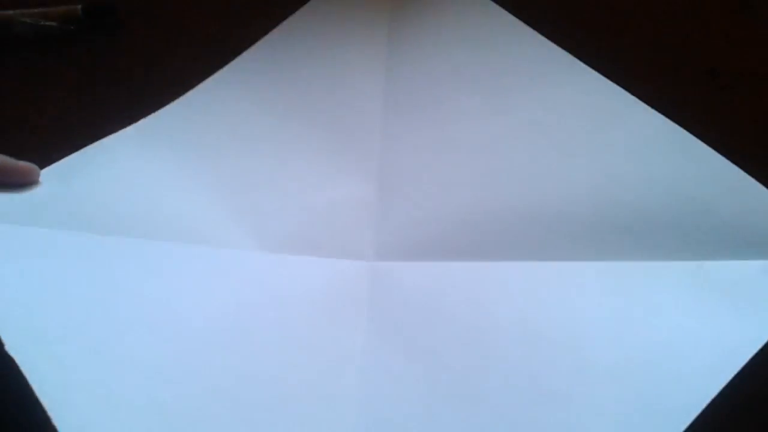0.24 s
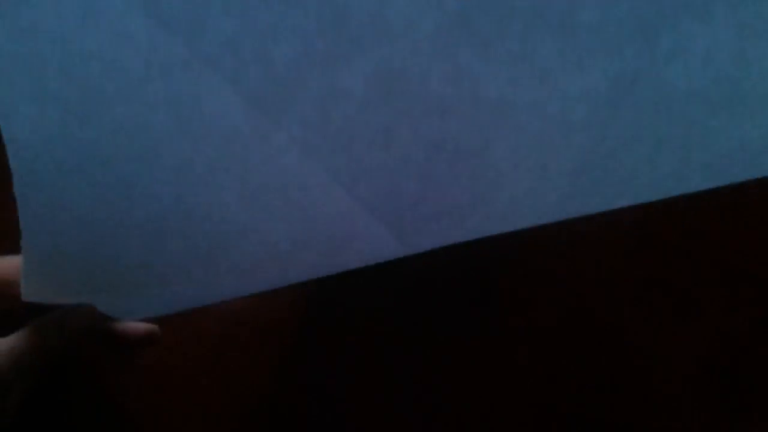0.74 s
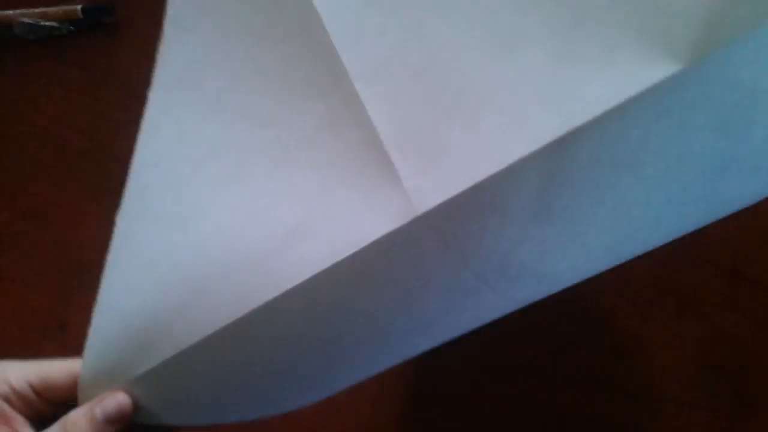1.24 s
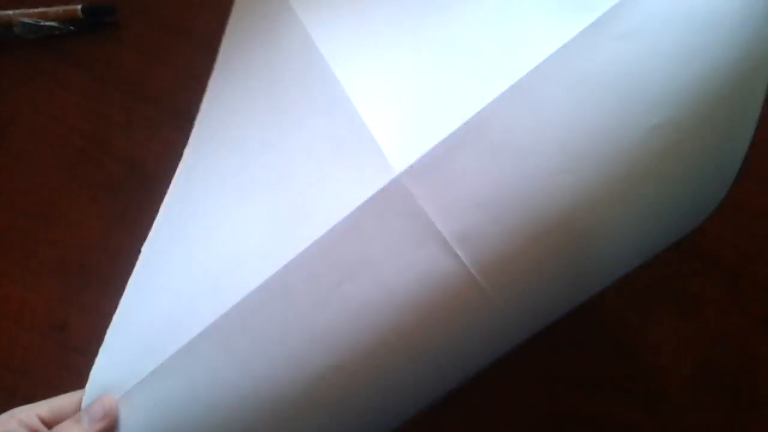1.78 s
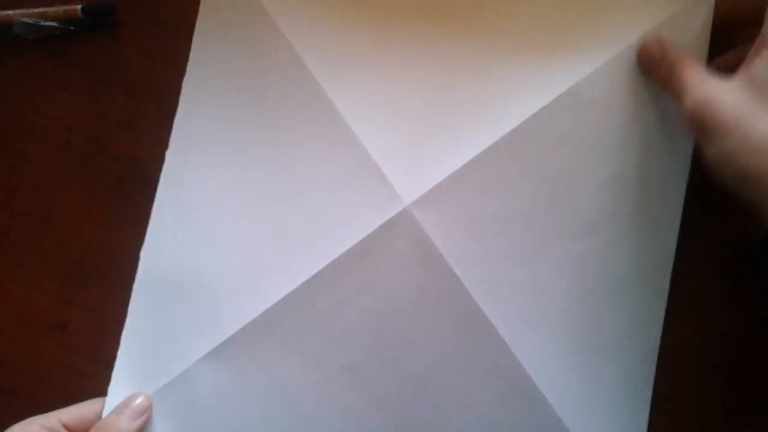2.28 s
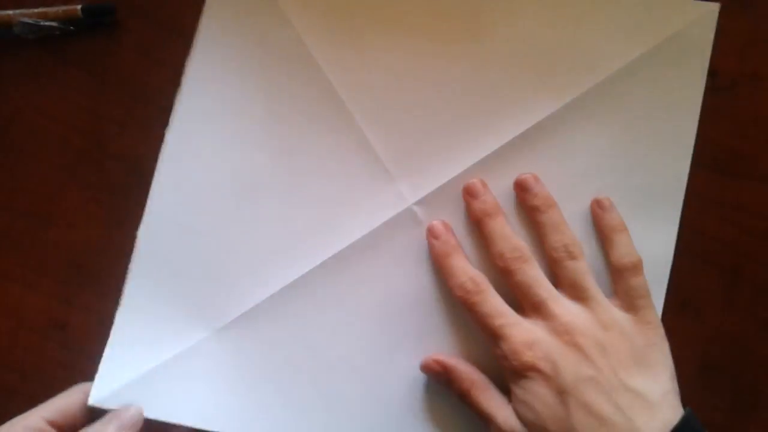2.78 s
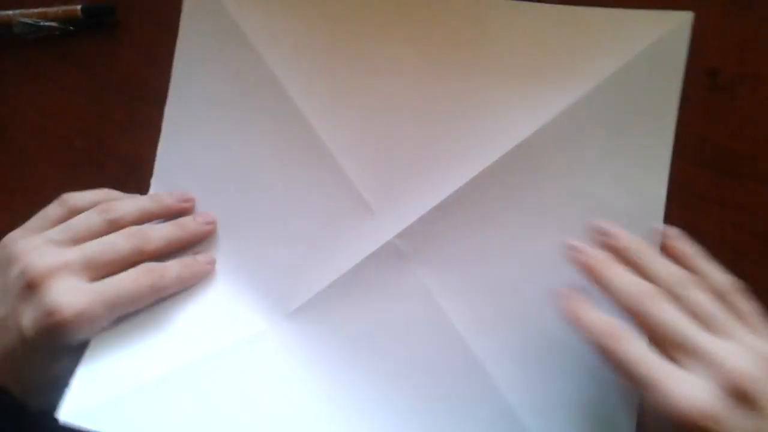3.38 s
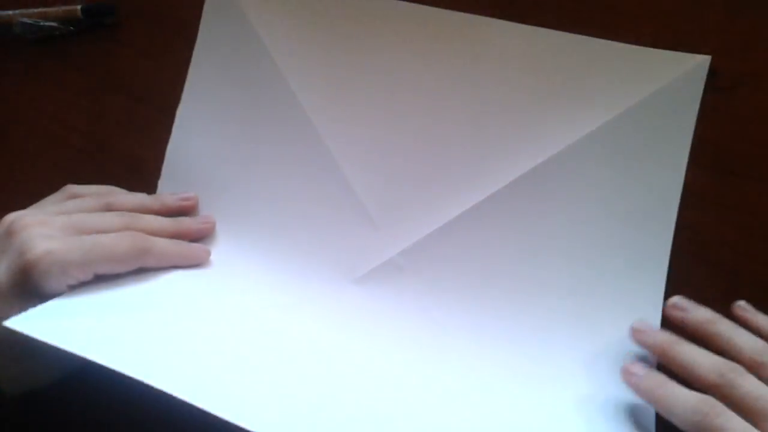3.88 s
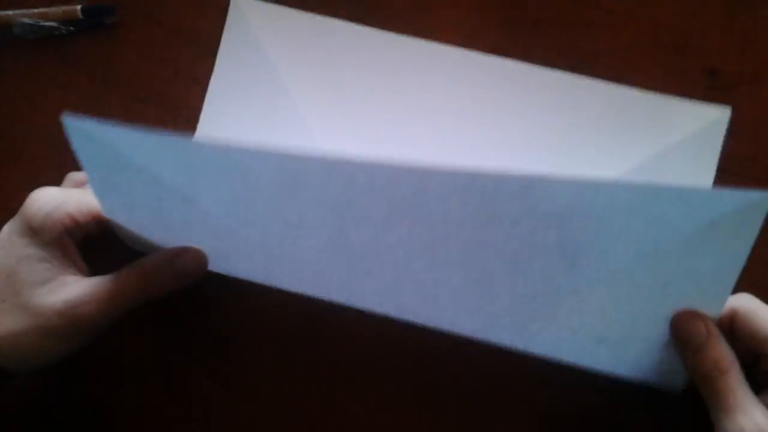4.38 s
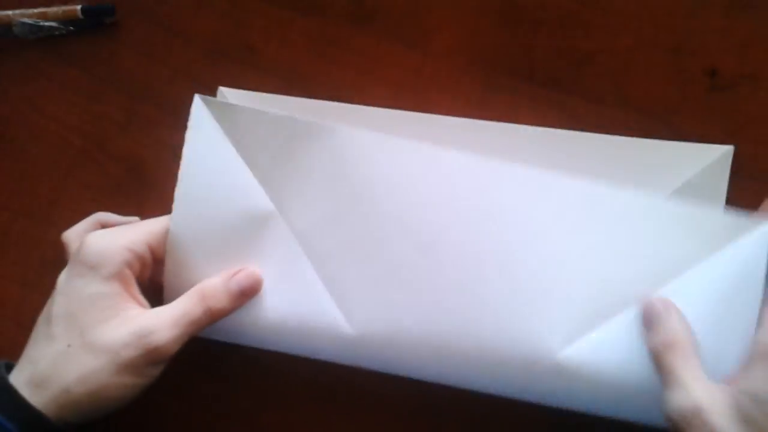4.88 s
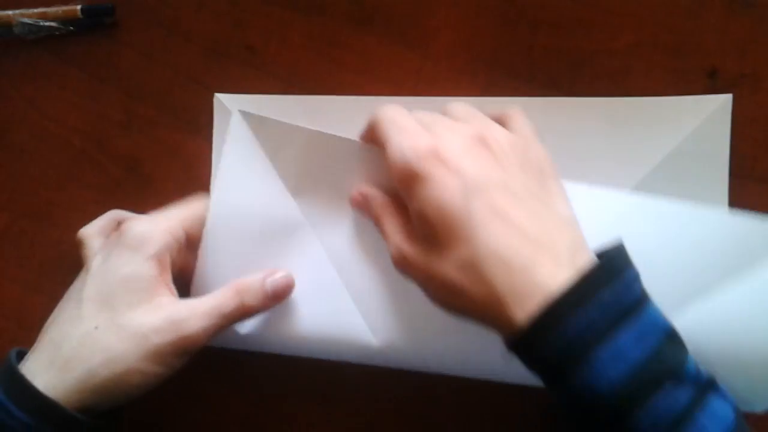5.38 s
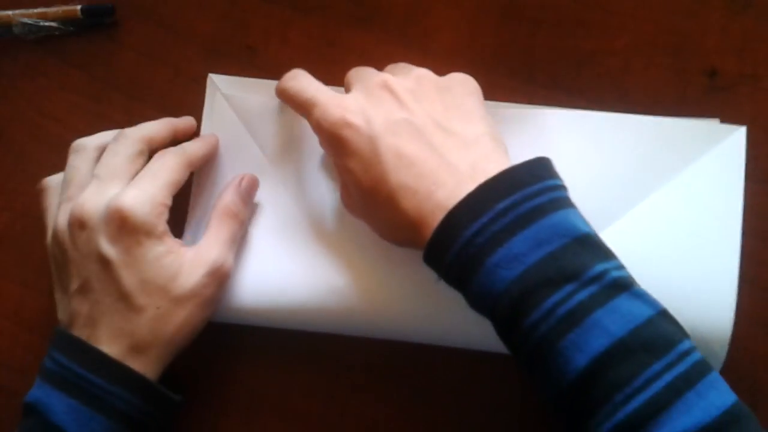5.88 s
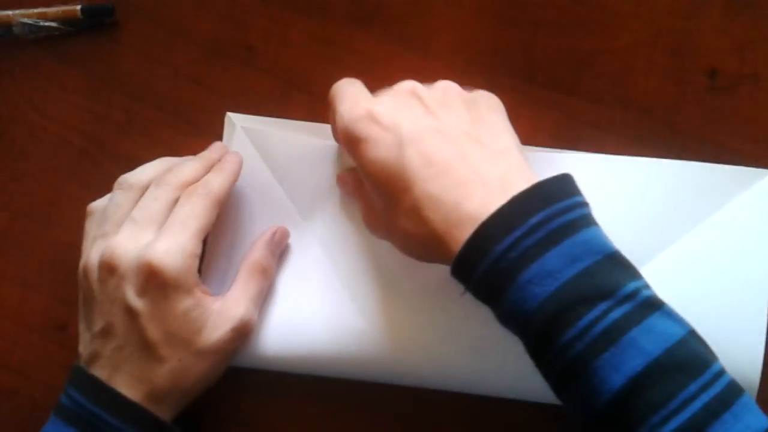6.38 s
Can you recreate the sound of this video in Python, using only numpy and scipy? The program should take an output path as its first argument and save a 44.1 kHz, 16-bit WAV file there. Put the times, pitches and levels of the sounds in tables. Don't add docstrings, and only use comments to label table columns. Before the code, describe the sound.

Stiff paper rustles and ticks as hands turn and fold it, with louder sharp crease pops near the end in a humming room.

```python
import sys
import numpy as np
from scipy import signal
from scipy.fft import rfft, irfft, next_fast_len
from scipy.io import wavfile
from scipy.ndimage import uniform_filter1d

SR = 44100
rng = np.random.default_rng(int(sys.argv[2]) if len(sys.argv) > 2 else 0)


def voltage_ratio(level):
    return 10 ** (np.asarray(level, float) / 20)


def generate_wav(signal):
    frames = np.transpose(np.atleast_2d(signal))
    scaled = np.clip(frames, -1, 1) * 32767
    pcm = np.round(scaled).astype(np.int16)
    wavfile.write(sys.argv[1], SR, pcm)


N = 292806

# low_hz, high_hz
PARTS = [
    (760, 1597),
    (1560, 3570),
    (3500, 7370),
]


def unit(x):
    return x / np.sqrt(np.mean(x ** 2))


def band(x, lo_hz, hi_hz, order=2):
    return signal.sosfilt(signal.butter(order, [lo_hz, hi_hz], "band", fs=SR, output="sos"), x)


def walk(rate_hz):
    hold = int(SR / rate_hz)
    steps = np.repeat(rng.standard_normal(N // hold + 1), hold)
    smooth = uniform_filter1d(uniform_filter1d(steps, hold), hold)
    return 1.3 * smooth[:N]


def fibres(shape, rate_hz, spread_db):
    slips = rng.random(shape) < rate_hz / SR
    size = np.minimum(rng.exponential(size=shape), 4)
    return slips * rng.standard_normal(shape) * voltage_ratio(spread_db * size)


def shares(level_db, tilt_db, focus_db):
    return level_db - tilt_db - focus_db, level_db, level_db + tilt_db - focus_db


def hum():
    # multiple, level_db (rms)
    tones = [(1, -75.5), (2, -73), (3, -71.5), (4, -72.5), (5, -56.5), (6, -60), (7, -72), (8, -82.5)]
    phase = 2 * np.pi * 100.08 * np.arange(N) / SR
    out = np.zeros(N)
    for multiple, level_db in tones:
        breath_db = min(2.1, 6 * voltage_ratio(-66 - level_db))
        level = np.sqrt(2) * voltage_ratio(level_db + breath_db * walk(6.9))
        out += level * np.sin(multiple * phase + 2 * np.pi * rng.random())
    return out


def fan():
    # pitch_hz, width_hz, level_db (rms)
    blurred = [(122.8, 15, -70), (203, 32, -68.5), (1151, 4.5, -68.5), (1375, 9.9, -70), (1650, 20, -75.5)]
    # pitch_hz, level_db (per Hz)
    air = [(30, -49.5), (60, -10), (110, -9), (165, -18.5), (250, 1), (450, 1), (800, -3), (1300, -5),
           (2000, -12.5), (4000, -14), (7000, -28.5)]
    tones = np.zeros(N)
    for hz, width, level_db in blurred:
        tone = band(rng.standard_normal(N), hz - width / 2, hz + width / 2, order=1)
        tones += voltage_ratio(level_db) * unit(tone)
    hz, level_db = np.transpose(air)
    n = next_fast_len(N)
    pitches = np.fft.rfftfreq(n, 1 / SR)
    colour = voltage_ratio(np.interp(np.log(pitches + 1), np.log(hz), level_db))
    rush = irfft(rfft(rng.standard_normal(n)) * colour, n)[:N]
    return tones + voltage_ratio(-61) * unit(rush)


def puffs():
    # start_s, peak_db, pitch_hz, length_s
    gusts = [(1.671, -46.5, 72.6, 0.041), (1.787, -46, 95, 0.034), (1.923, -64, 50, 0.053),
             (2.004, -58, 59, 0.049), (5.712, -48, 120, 0.049)]
    out = np.zeros(N)
    for start, peak_db, hz, length in gusts:
        t = np.arange(int(length * SR)) / SR
        swell = np.sin(np.pi * t / length) ** 2
        cycles = np.sin(2 * np.pi * hz * t * (1 - 0.042 * t / length))
        i = int(start * SR)
        out[i:i + len(t)] += voltage_ratio(peak_db) * swell * cycles
    return out


def strokes():
    # fastest_s, spread_s, level_db, tilt_db
    moves = [(.005, 0.022, -65, 6), (0.348, 0.054, -53.5, 3), (.47, 0.021, -59, 2.5), (.66, 0.18, -66, 4.5),
             (.89, 0.16, -62.5, 1.5), (1.161, 0.061, -58, 2.5), (1.35, 0.063, -63.5, 2),
             (1.531, 0.062, -61, 2.5), (1.749, 0.08, -56.5, 5), (1.9, .04, -62.5, 5.5),
             (2.192, 0.045, -58.5, 1), (2.62, 0.037, -64, 5), (2.831, 0.077, -57.5, 5.5),
             (3.141, 0.062, -58, 8), (3.25, 0.046, -58, -1), (3.42, 0.11, -64.5, 2), (3.59, 0.037, -67, 5),
             (3.905, 0.082, -54, 3), (4.19, 0.084, -63.5, 3.5), (4.339, 0.048, -67, 12),
             (4.67, 0.11, -53.5, 0), (4.88, 0.036, -47.5, -2), (5.041, 0.037, -52.5, 2),
             (5.28, 0.085, -57, 0), (5.448, 0.08, -49.5, 1), (5.66, .04, -55.5, 4.5),
             (5.778, 0.033, -53, 6), (6.11, 0.062, -50, 2), (6.34, 0.085, -54, 5.5),
             (6.581, 0.12, -53.5, 2)]
    # time_s, level_db
    stir = [(0, -64.5), (1.0, -71), (2.0, -64.5), (2.45, -74.5), (3.0, -65), (3.7, -65), (4.4, -62),
            (5.2, -58.5), (5.9, -58), (6.64, -61.5)]
    focus_db = -0.7
    t = np.arange(N) / SR
    stir_db = np.interp(t, *np.transpose(stir))
    power = voltage_ratio(np.array(shares(stir_db, 1.5, focus_db))) ** 2
    for fastest, spread, level_db, tilt_db in moves:
        part_power = voltage_ratio(np.array(shares(level_db, tilt_db, focus_db))) ** 2
        speed = np.exp(-((t - fastest) / spread) ** 2)
        power = power + np.outer(part_power, speed)
    return np.sqrt(power)


def slide():
    slips = unit(fibres(N, 2500, 1.85))
    scrape = slips * 0.49 + rng.standard_normal(N)
    pressure = walk(30)
    out, sign = 0, 1
    for (lo, hi), gain in zip(PARTS, strokes()):
        edges = np.geomspace(lo, hi, 4)
        part = 0
        for lo_hz, hi_hz in zip(edges, edges[1:]):
            sign = -sign
            swell_db = 2.0 * walk(14) + 2.76 * walk(45)
            part = part + sign * band(scrape, lo_hz, hi_hz) * voltage_ratio(swell_db)
        out = out + unit(part) * gain * voltage_ratio(1.24 * pressure)
    return out


def rings(table, detune_octaves, count):
    out = np.zeros(N + SR)
    t = np.arange(SR // 6) / SR
    chances = rng.uniform(-1.012, 1, (len(table), count))
    for (start, hz, level_db, t60), chance in zip(table, chances):
        pitches = hz * 2 ** (detune_octaves * chance)
        modes = np.sin(2 * np.pi * np.outer(pitches, t)).sum(axis=0) / np.sqrt(3 * count)
        onset = 1 - np.exp(-hz * t)
        i = int(start * SR)
        out[i:i + len(t)] += onset * voltage_ratio(level_db - 60 * t / t60) * modes
    return band(out[:N], 170, 9000)


def table_knocks():
    # start_s, pitch_hz, level_db
    knocks = [(.300, 810, -37), (.318, 842, -38), (.369, 720, -32.5), (1.503, 971, -39), (1.94, 653, -43),
              (3.44, 700, -43), (4.146, 795, -32.5), (5.66, 647, -40.5), (0.431, 447, -43),
              (1.502, 413, -37), (1.862, 422, -34), (1.885, 524, -40.5), (3.434, 350, -45),
              (4.143, 571, -39), (4.845, 560, -39), (4.869, 414, -40), (4.896, 338, -55),
              (4.905, 563, -31.5), (4.930, 420, -46), (4.963, 295, -42.5), (4.974, 499, -35.5),
              (5.158, 424, -37.5), (5.374, 308, -39.5), (5.425, 350, -37.5), (5.47, 363, -46),
              (6.036, 574, -42)]
    table_t60_s = 0.16
    return rings([(*row, table_t60_s) for row in knocks], 0.503, count=9)


def taut_patches():
    # start_s, pitch_hz, level_db, t60_s
    patches = [(.765, 836, -45.5, 0.23), (1.501, 3190, -30, 0.02), (1.798, 4140, -33.5, 0.096),
               (1.807, 3910, -35, 0.082), (1.813, 3200, -27.5, 0.038), (1.861, 4990, -27, 0.056),
               (1.866, 2010, -19.5, 0.061), (2.63, 2363, -23.5, 0.066), (2.889, 4280, -21.5, 0.023),
               (2.660, 4380, -29.5, 0.038), (2.9755, 3320, -26, 0.0093), (3.9735, 3700, -28, 0.015),
               (4.1425, 1680, -34, .012), (2.889, 1290, -21, 0.021), (4.925, 4270, -26, 0.045),
               (4.962, 2630, -35, 0.061), (5.4229, 4820, -12.5, .018), (5.4232, 3090, -6, 0.0043),
               (5.4232, 1920, -10.5, 0.0079), (5.436, 3120, -28, 0.052), (5.4684, 2770, -19, 0.0056),
               (5.4692, 5650, -17, 0.014), (5.475, 2440, -24, 0.089), (6.034, 5040, -16, 0.032),
               (6.036, 930, -27, 0.14), (6.044, 955, -31.5, .1)]
    return rings(patches, 0.12, count=3)


def buckles(table, focus_db):
    # t60_s, level_db
    tails = [
        (0.23, -0.5),
        (0.22, -3.5),
        (0.24, -5),
    ]
    out = np.zeros(N + SR)
    t = np.arange(SR // 4) / SR
    for start, level_db, tilt_db, release, rattle_db in table:
        life = max(release, 2e-4)
        slips = t / life * np.exp(-t / life) * fibres(len(t), 14000, 0.28)
        rattle = rng.standard_normal(len(t)) * (1 - np.exp(-t / (0.00032 + life)))
        i = int(start * SR)
        for (lo, hi), part_db, (t60, tail_db) in zip(PARTS, shares(level_db, tilt_db, focus_db), tails):
            tail = unit(band(rattle * voltage_ratio(-60 * t / t60), lo, hi, order=4))
            burst = unit(band(slips, lo, hi, order=4)) + voltage_ratio(rattle_db + tail_db) * tail
            out[i:i + len(t)] += burst * voltage_ratio(part_db - 14.5)
    return out[:N]


def crumples():
    # start_s, level_db, tilt_db, release_s, rattle_db
    folds = [(.315, -58, 5, 0.012, 6), (1.796, -50.5, 1, 0.0054, 7), (1.833, -53.5, -13.5, 0.0035, 5),
             (1.857, -42, -14, .0017, 1), (1.943, -59, -21.5, 0.0056, -5.5), (2.19, -54, 4, 0.018, 4.5),
             (2.64, -56.5, 8, 0.011, -8), (2.663, -46, -12, .0041, -9.5), (3.265, -50.5, 1.5, 0.0027, 5.5),
             (3.432, -54.5, -11.5, 0.0044, -2.5), (4.376, -68, -16.5, 0.0025, -15),
             (4.646, -58.5, 17, 0.0065, -12), (4.7, -49, 9, .0087, 0), (4.837, -48.5, -10.5, 0.0029, 3),
             (4.871, -55, -5, 0.0077, -19), (4.918, -36.5, -2, 0.0055, -4.5), (4.957, -41, -10, 0.0049, 3),
             (5.36, -60, -19, 0.0061, -5), (5.417, -29, 1, 0.01, -3.5), (5.6, -53, -2.5, 0.003, 6),
             (5.657, -50.5, -15.5, 0.011, -2.5), (6.011, -56, 5, 0.0034, 14),
             (6.041, -34.5, -6, 0.0024, -18), (6.233, -52.5, 9, 0.022, 6.5)]
    return buckles(folds, focus_db=4)


def snaps():
    # start_s, level_db, tilt_db, release_s, rattle_db
    sharp = [(.37, -49.5, -6, 0.00063, -15), (1.5, -48.5, 2.5, 0.0019, -9.5),
             (1.864, -35, -11, 0.0022, -0.5), (1.877, -45, -6, 0.0007, 3), (2.621, -46.5, -4.5, .0011, 0),
             (2.631, -46, 3, 0.0011, 7), (2.659, -47.5, 1, 0.0018, 4), (2.672, -47.5, 15.5, 0.00044, 0.5),
             (2.887, -34, 2, 0.00024, 0), (2.975, -46.5, 5.5, 0.00024, -7), (3.22, -51.5, 2, .0013, 7),
             (3.973, -39.5, 7.5, 0.0025, -2.5), (4.142, -54, -8.5, 0.00056, -0.5),
             (4.656, -48, -1, .00091, 5.5), (4.866, -37, -8, 0.0017, 2), (4.894, -35, 10, 0.0028, -1),
             (4.902, -36, -8, 0.001, -2.5), (5.156, -59, -23.5, 0.00028, 3), (5.422, -27.5, 2, 0.0016, -2),
             (5.469, -29.5, 1.5, 0.00081, 1), (5.472, -31, -4.5, 0.0007, -16),
             (6.034, -30, -0.5, 0.0016, -2.5)]
    # start_s, level_db, tilt_db
    faint = [(.229, -61, 2), (0.293, -57, 3), (1.811, -67, -5), (2.615, -50.5, 0), (2.988, -52, 13.5),
             (3.235, -65, 4), (3.251, -66, 8), (3.276, -59, 15.5), (3.402, -56.5, -4), (3.844, -58.5, -8),
             (4.612, -65, 1), (5.083, -55, 9.5), (6.375, -62, 20)]
    release_s, rattle_db = 0.0011, 7
    ticks = [(*row, release_s, rattle_db) for row in faint]
    return buckles(sharp + ticks, focus_db=7)


def scene():
    room = hum() + fan()
    sheet = puffs() + slide() + crumples() + snaps()
    ringing = table_knocks() + taut_patches()
    return (room + sheet + ringing)[None]


def band_limit(x):
    return signal.sosfilt(signal.butter(12, 8990, fs=SR, output="sos"), x)


def record(dry):
    t = np.arange(N) / SR
    clock_hz = 16000
    soft = signal.sosfilt(signal.butter(7, 7000, fs=SR, output="sos"), dry)
    sound = signal.sosfilt(signal.ellip(8, 0.3, 55, 7600, fs=SR, output="sos"), soft)
    mirror = band(sound * np.cos(2 * np.pi * clock_hz * t), 8400, 8950, order=6)

    def level_db(part):
        power = uniform_filter1d(band(dry, *part) ** 2, SR // 25)
        return 10 * np.log10(power + 1e-12)

    belly_db, treble_db = level_db(PARTS[0]), level_db(PARTS[2])
    needs_db, lead_db, shuts_db = -57.5, -2, -48
    margins_db = [treble_db - needs_db, treble_db - belly_db - lead_db, shuts_db - treble_db]
    gate = np.clip(np.min(margins_db, axis=0) / 2, 0, 1)
    top = band(soft, 7600, 8400, order=6) * gate
    return band_limit(sound + voltage_ratio(-16.5) * mirror + voltage_ratio(-1.5) * top)


dry = scene()
out = record(dry)
generate_wav(out)
```